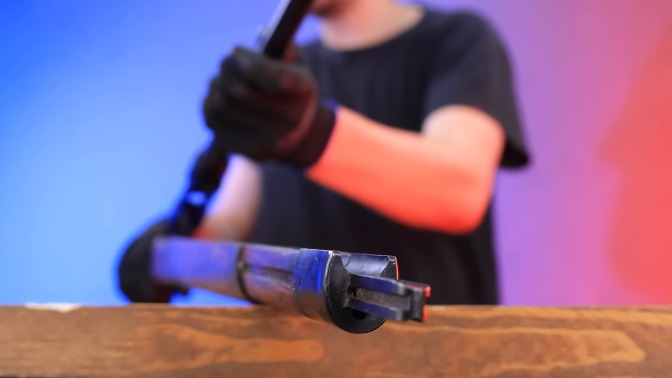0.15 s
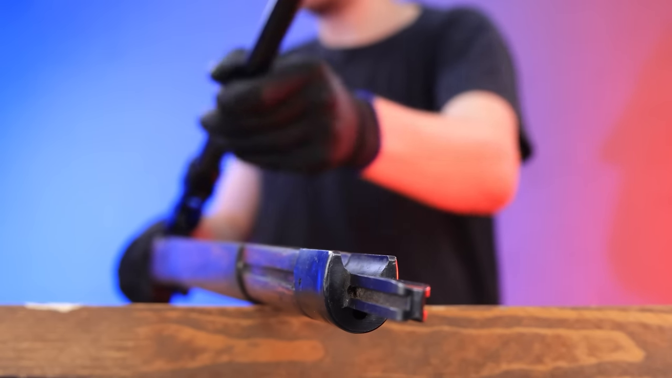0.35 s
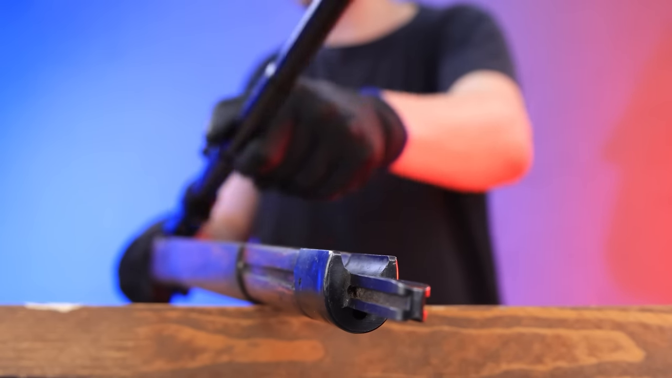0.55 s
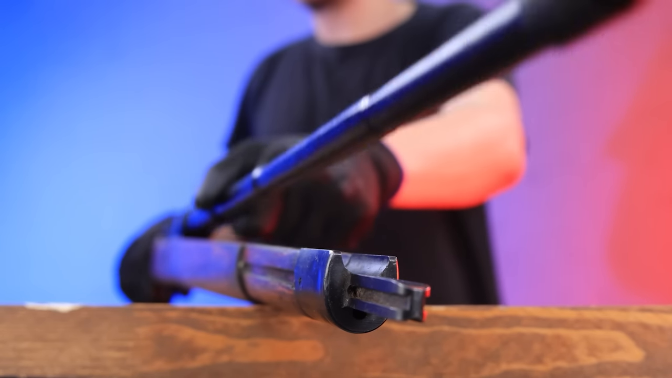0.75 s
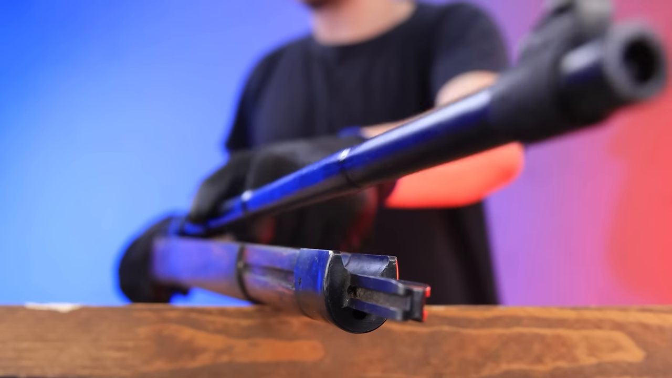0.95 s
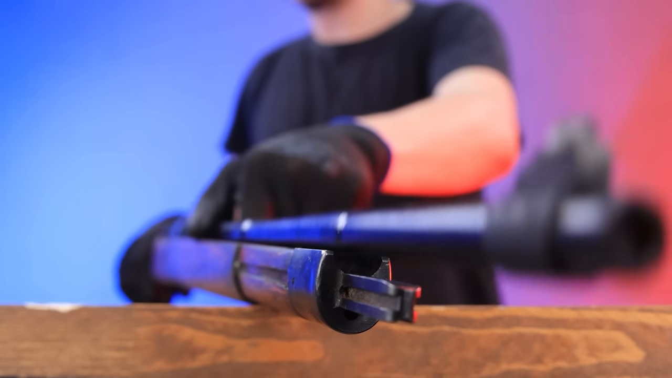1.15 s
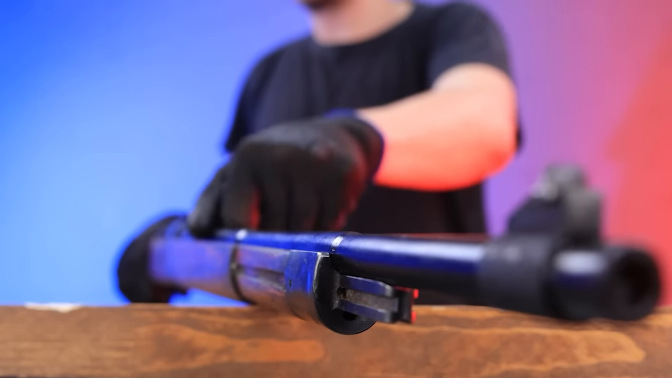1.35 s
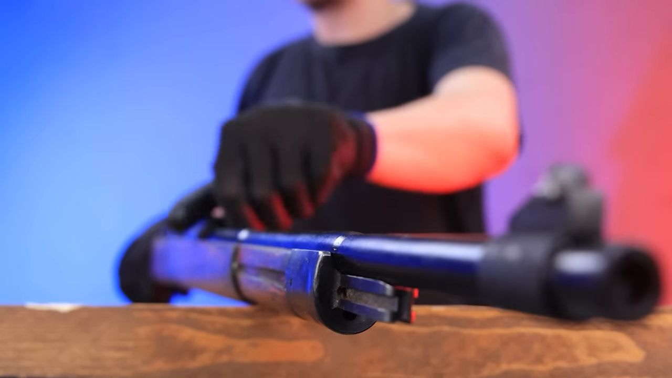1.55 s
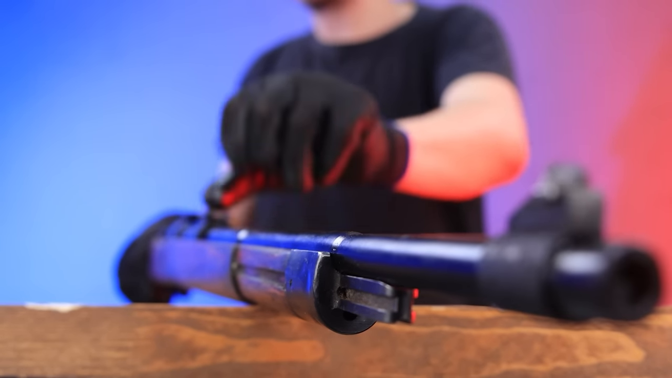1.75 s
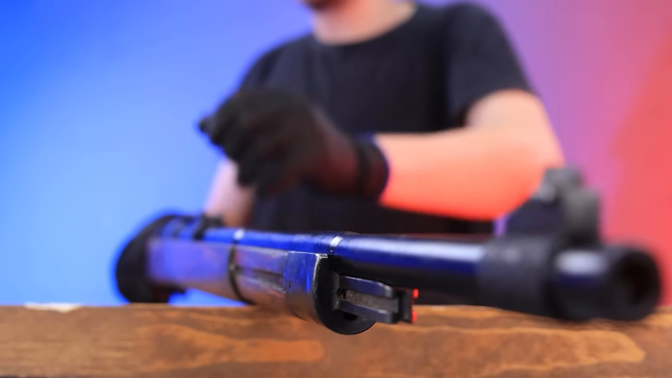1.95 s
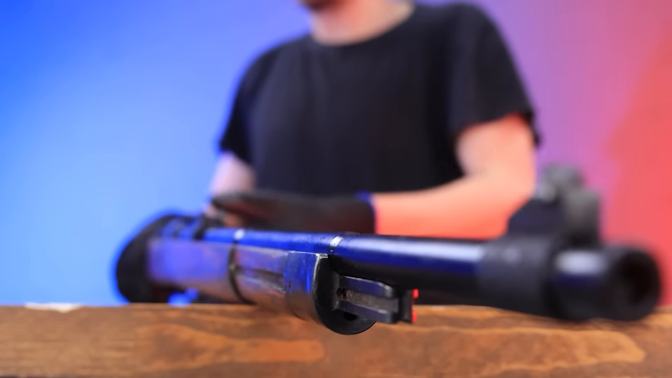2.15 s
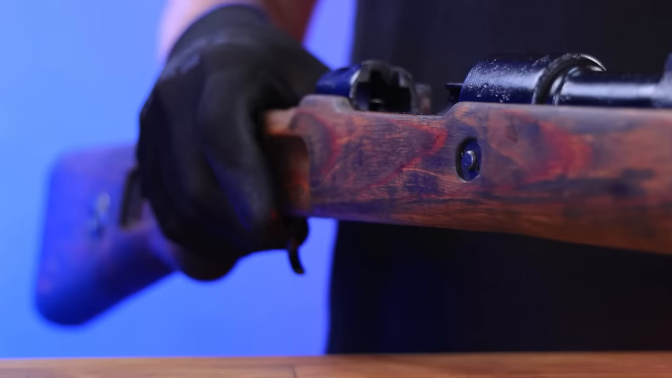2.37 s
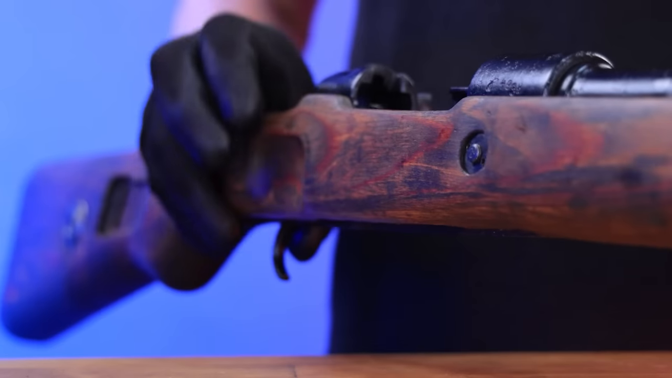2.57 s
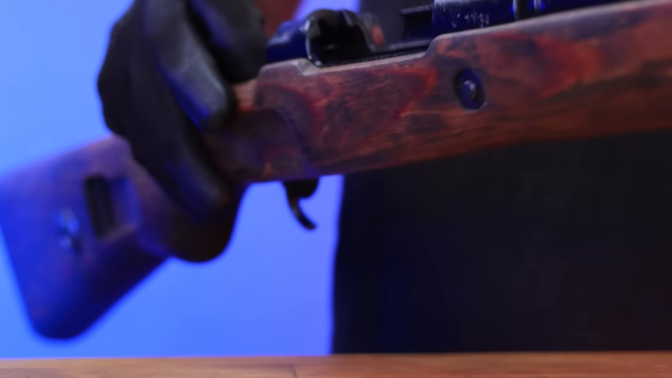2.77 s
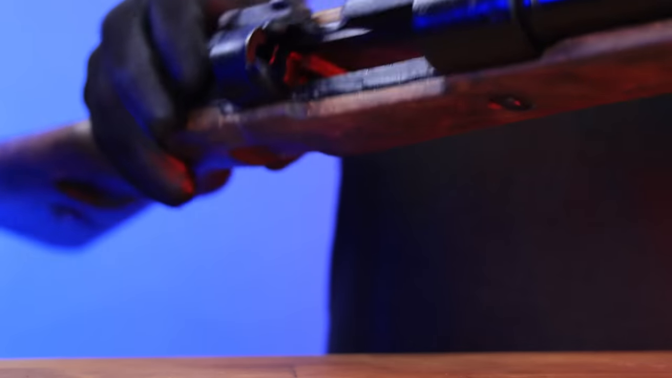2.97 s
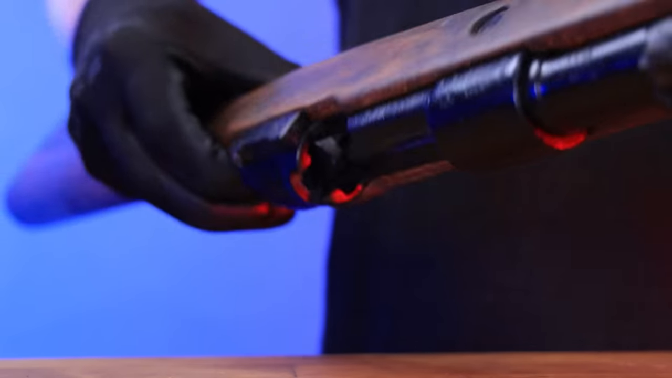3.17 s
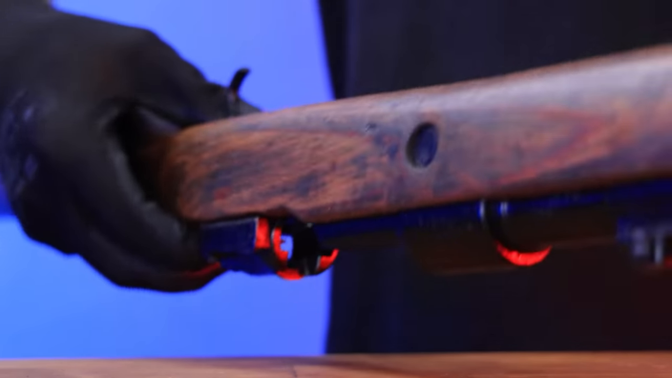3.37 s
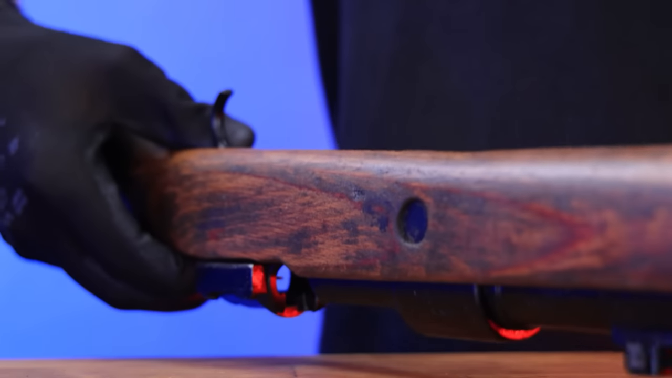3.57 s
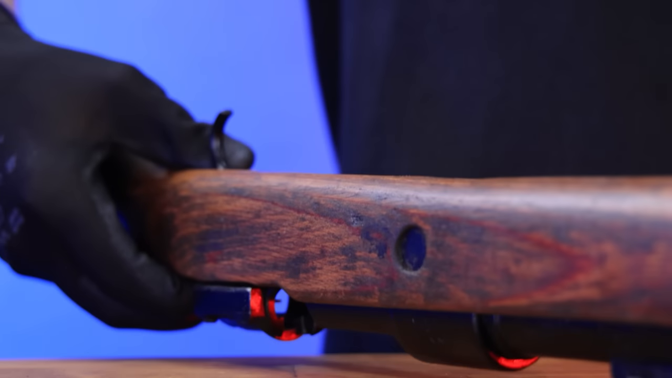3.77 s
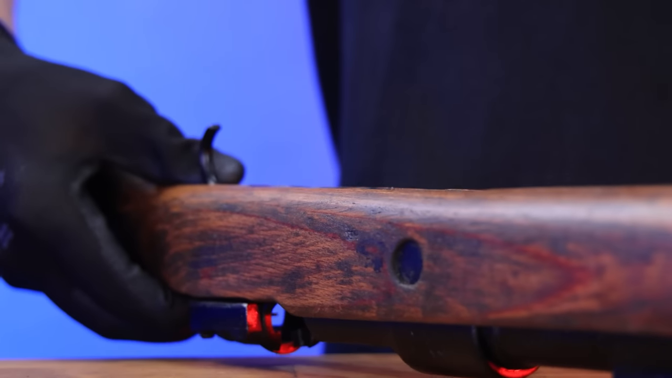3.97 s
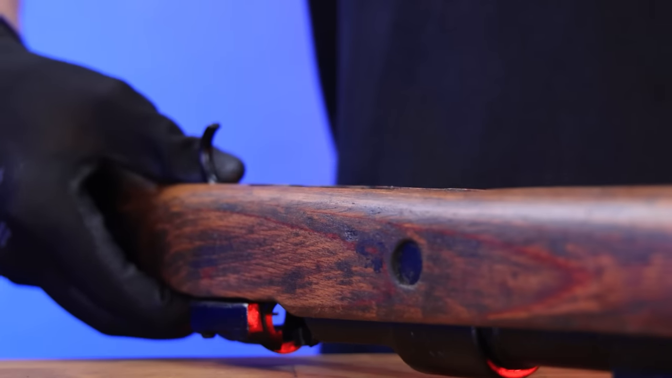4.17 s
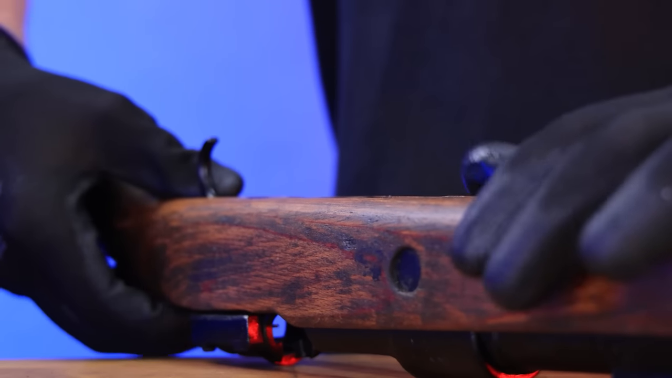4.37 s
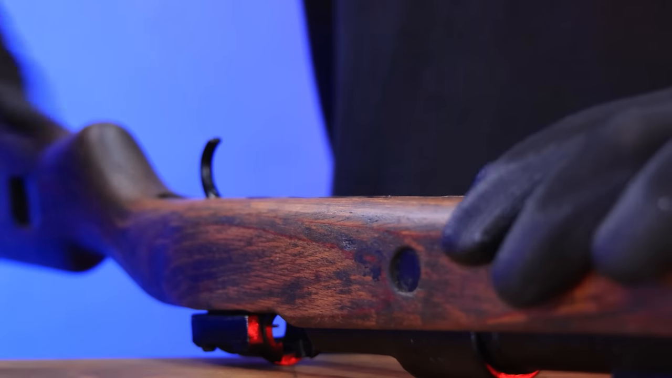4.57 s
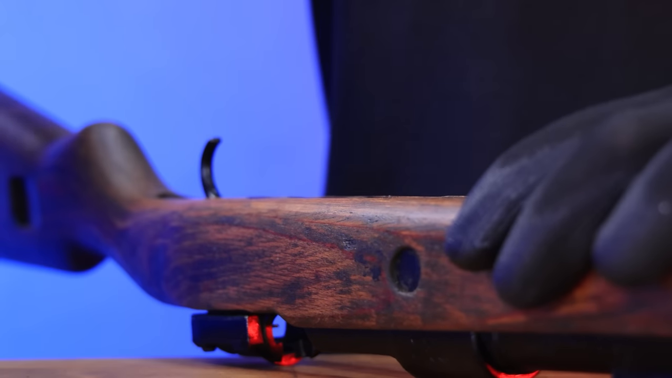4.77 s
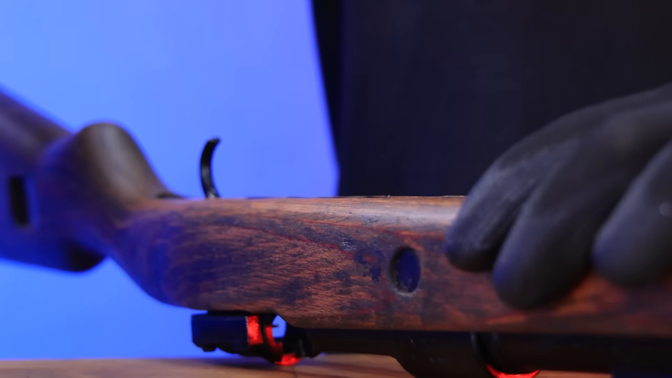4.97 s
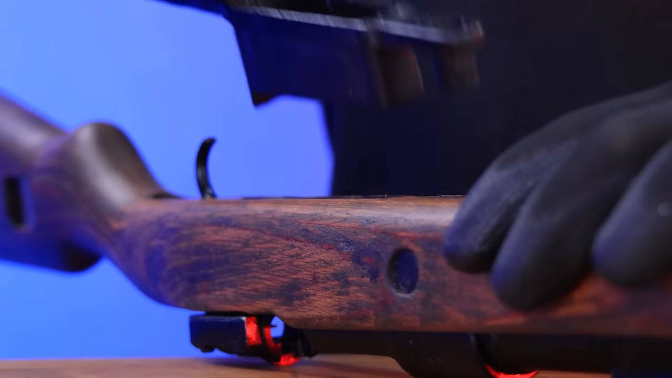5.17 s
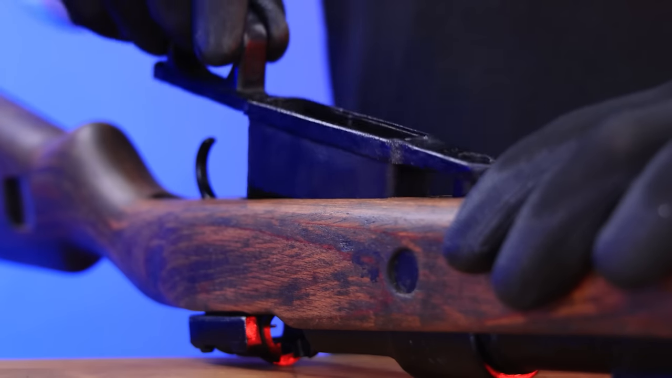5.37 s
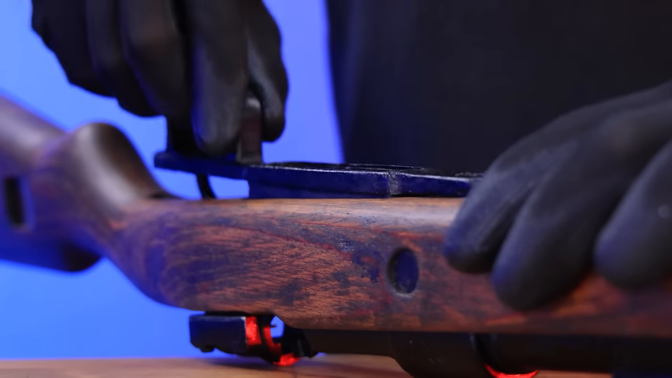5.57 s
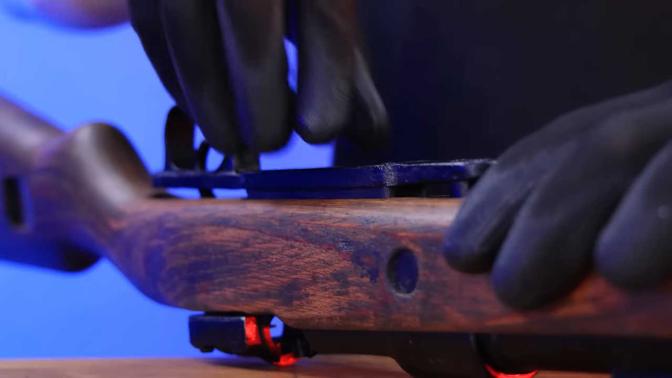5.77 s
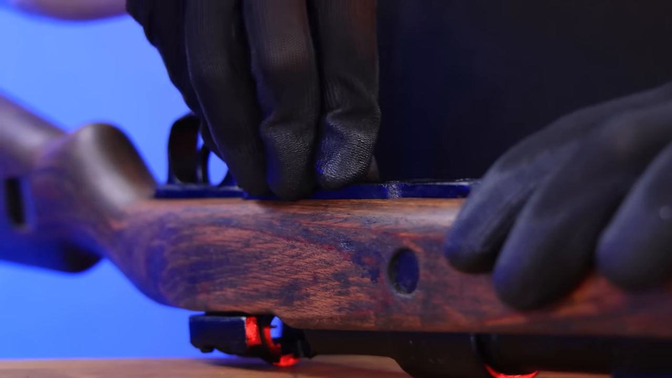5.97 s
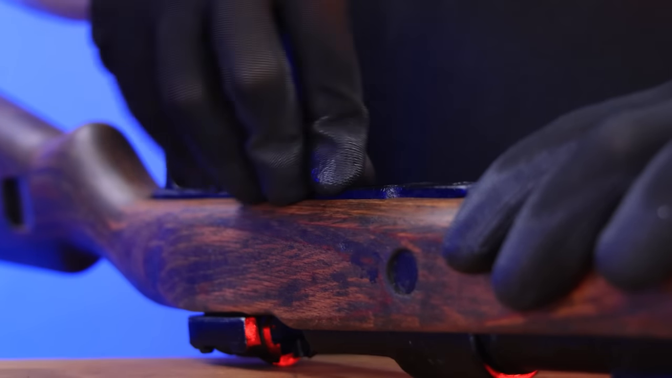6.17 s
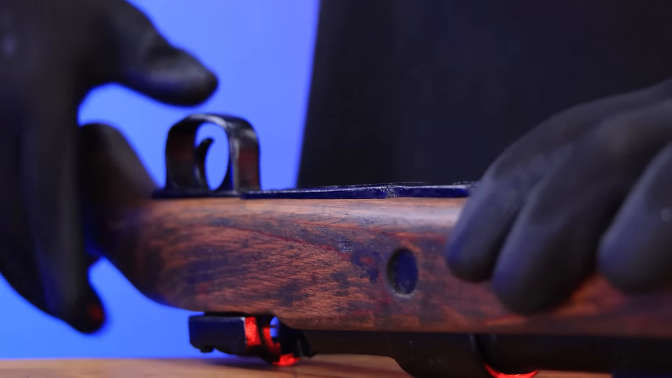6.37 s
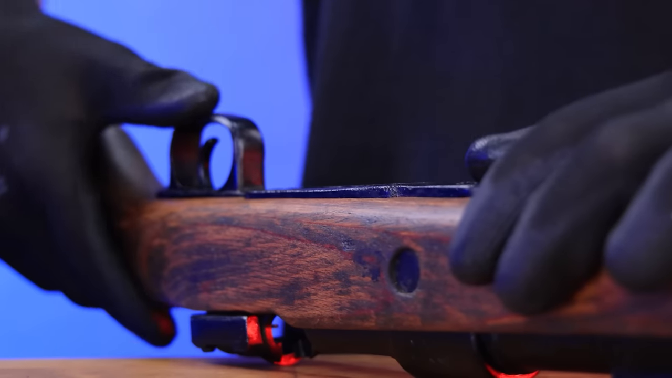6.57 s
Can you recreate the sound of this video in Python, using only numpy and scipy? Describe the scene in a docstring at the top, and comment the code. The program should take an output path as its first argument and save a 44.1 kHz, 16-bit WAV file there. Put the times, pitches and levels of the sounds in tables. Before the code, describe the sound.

In a small, quiet workshop with a faint low hum, gloved hands assemble a rifle close to the microphone. Faint wooden bumps and glove rubs lead to a loud steel-and-wood clunk with a thin high ring. Two needle-sharp ticks and a woody snap follow. Fabric rustles as the rifle turns, a metallic clack sounds, then a firm knock on the bench. Softer knocks and dull clicks end it as the magazine is seated.

```python
"""A bolt-action rifle is put together on a wooden bench in a small workshop, over still air and a faint hum.
First the barrel is lowered, drops into the stock, sings on and is pressed home; the tang snaps in with two dry ticks.
Then gloves rub as the stock turns in the grip, and the rifle is turned over and laid down with a knock.
Last the hands shift, and the magazine goes in and is seated.
Each touch is a crunch of tiny impacts fed to steel or wood resonances; the gloves are grainy filtered noise."""
import sys
import numpy as np
from scipy import signal
from scipy.fft import rfft, irfft, next_fast_len
from scipy.io import wavfile

SR = 44100
rng = np.random.default_rng(int(sys.argv[2]) if len(sys.argv) > 2 else 0)


def waveform_to_disk(signal):
    """Save audio, clipped to [-1, 1], as 16-bit WAV at the path in sys.argv[1]."""
    frames = np.transpose(np.atleast_2d(signal))
    scaled = np.clip(frames, -1, 1) * 32767
    samples = np.round(scaled).astype(np.int16)
    wavfile.write(sys.argv[1], SR, samples)


N = 292383
TIME = np.arange(N) / SR
SPAN = SR // 2   # samples given to a tail
TOUCH = SR // 4   # samples given to one touch
LEAD_S = .03   # room for the swell before a touch


def from_db(db):
    """Decibels to an amplitude factor."""
    return 10 ** (np.asarray(db) / 20)


def rms_one(x):
    """Scale to an rms of 1."""
    return x / np.sqrt(np.mean(x ** 2) + 1e-20)


def energy_one(pair):
    """Scale each channel to an energy of 1."""
    return pair / np.sqrt(np.sum(pair ** 2, axis=1, keepdims=True) + 1e-20)


def at_hz(points, hz):
    """Read a table on a log-frequency axis."""
    table = np.array(points)
    return np.interp(np.log(hz), np.log(table[:, 0]), table[:, 1])


def band(x, edges_hz, kind="band", order=2):
    """Causal Butterworth filter."""
    edges_hz = np.clip(edges_hz, 10, .45 * SR)
    sos = signal.butter(order, edges_hz, kind, fs=SR, output="sos")
    return signal.sosfilt(sos, x + 1e-18)


def add(out, s, sound):
    """Lay a sound into the track at time s, trimmed to the track's ends."""
    i = round(s * SR)
    out[..., max(i, 0):i + sound.shape[-1]] += sound[..., max(-i, 0):N - i]


def stereo(pair, side_db):
    """Left and right from a mid and a side signal, at equal power."""
    mid, side = pair[0], from_db(side_db) * pair[1]
    polarity = np.array([[1], [-1]])
    return (mid + side * polarity) / np.sqrt(1 + from_db(side_db) ** 2)


def coloured(spectrum):
    """Two unrelated noises of one colour, together at an rms of 1."""
    size = next_fast_len(N)
    hz = np.maximum(np.fft.rfftfreq(size, 1 / SR), 1)
    white = rfft(rng.standard_normal((2, size)))
    return rms_one(irfft(white * from_db(at_hz(spectrum, hz)), size)[:, :N])


def noise_bands(size):
    """Half-octave noise bands with their centres; each is a pair, and neighbours use unrelated noises."""
    edges = np.geomspace(20, 18000, 21)
    white = rng.standard_normal((2, 2, size))
    bands = []
    for k, (lo, hi) in enumerate(zip(edges, edges[1:])):
        bands.append((np.sqrt(lo * hi), band(white[k % 2], [lo, hi])))
    return bands


def crunch(length, onset, release, per_s, spread_db):
    """Force of one touch: tiny impacts of uneven size that swell and fade as the faces settle."""
    t = np.arange(TOUCH) / SR - LEAD_S
    rise = 1 + np.tanh(t / (2 * onset))
    fall = 1 + np.tanh((length - t) / (2 * release))
    hits = rng.random(TOUCH) < per_s / SR
    sizes = from_db(spread_db * np.clip(rng.standard_normal(TOUCH), -2, 2))
    signs = rng.choice([-1, 1], (2, TOUCH))   # unrelated in mid and side
    return rise * fall * hits * sizes * signs


def resonate(force, modes, damping_hz, bare_db):
    """Each resonance takes its share of the blow and rings it out; some of the contact is heard bare."""
    ring = 0
    for k, (hz, width, db) in enumerate(modes):
        r = np.exp(-np.pi * (width + damping_hz) / SR)   # more damping, shorter ring
        poles = [1, -2 * r * np.cos(2 * np.pi * hz / SR), r * r]
        mode = signal.lfilter([1, 0, -1], poles, force + 1e-18)
        ring = ring + (-1) ** k * from_db(db) * np.sqrt(width) * energy_one(mode)
    return energy_one(ring) + from_db(bare_db) * energy_one(force)


def tilted(level_db, brightness_db, lift_db):
    """Low, middle and high levels of a blow: the harder the contact, the more goes to the high modes."""
    outer_db = level_db - lift_db
    return [outer_db - brightness_db, level_db, outer_db + brightness_db]


def voiced(pair, length, edges_hz, levels_db):
    """Where and how hard a part is met shares the blow's energy among its low, middle and high modes."""
    total = 0
    for lo, hi, db in zip(edges_hz, edges_hz[1:], levels_db):
        total = total + from_db(db) * energy_one(band(pair, [lo, hi], order=3))
    return np.sqrt(length * SR) * total   # a longer touch carries more energy


# still air of the room: (f/Hz, relative level/dB per Hz)
AIR_SPECTRUM = [(20, -19.5), (48, -1.5), (75, -19.5), (105, -14.5), (150, -17), (210, -15.5), (270, -16),
                (320, -7.5), (400, -19), (700, -18.5), (1100, -20.5), (2500, -31), (6000, -42.5),
                (16000, -43.5)]
# how diffuse the air is: (f/Hz, tilt of its side level/dB)
AIR_WIDTH = [(60, -9.5), (180, -5), (550, -6), (1650, -3.5), (4970, 0), (15000, -2)]
# mains hum partials: (f/Hz, level/dB rms before waver and dips)
HUM_PARTIALS = [(49, -60), (150.3, -67), (313, -68), (651, -77.5)]


def background(air_db=-60.5, side_db=-5, waver=.15, waver_hz=12):
    """Still air, diffuse above the bass, and a wavering mains hum."""
    hum = 0
    for hz, db in HUM_PARTIALS:
        wavering = 1 + waver * rms_one(band(rng.standard_normal(N), waver_hz, "low"))
        tone = np.sin(2 * np.pi * (hz * TIME + rng.random()))
        hum = hum + from_db(db) * np.sqrt(2) * wavering * tone
    side_spectrum = [(hz, db + at_hz(AIR_WIDTH, hz)) for hz, db in AIR_SPECTRUM]
    air = stereo([coloured(AIR_SPECTRUM)[0], coloured(side_spectrum)[0]], side_db)
    return hum + from_db(air_db) * air


# brief dips of gloves and background: (t/s, depth/dB, recovery time constant/s)
LEVEL_DIPS = [(0.949, 12, 0.29), (2.35, 11, 0.062)]


def dips(steady_db=0.78):
    """Gain of the quiet sounds: twice it drops at once and creeps back."""
    lost_db = 0
    for s, depth_db, recovery in LEVEL_DIPS:
        lost_db = lost_db + depth_db * (TIME >= s) * np.exp(-np.abs(TIME - s) / recovery)
    return from_db(steady_db - lost_db)


# how long the workshop rings: (f/Hz, t60/s)
ROOM_DECAY = [(60, 0.47), (250, 0.21), (1000, 0.25), (4000, 0.21), (8000, 0.1), (15000, 0.34)]


def workshop(x, first_echo_s=0.0045, side_db=-2):
    """A short diffuse tail: each band of noise dies at its own pace, longest in the bass."""
    t = TIME[:SPAN]
    tail = sum(noise * from_db(-60 * t / at_hz(ROOM_DECAY, hz)) for hz, noise in noise_bands(SPAN))
    fade_in = np.clip(t / first_echo_s - 1, 0, 1)   # silent until the first echo
    tail = stereo(tail, side_db) * fade_in
    return signal.fftconvolve(x, energy_one(tail), axes=1)[:, :N]


def stroke(s, rise, hold, rise_db=25, fade_db_per_s=284):
    """Level in dB of one stroke: the hand gathers speed, slides and comes to rest."""
    gathering = rise_db * np.maximum(s - TIME, 0) / rise
    resting = fade_db_per_s * np.maximum(TIME - s - hold, 0)
    return -gathering - resting


# colour of fabric on steel and wood: (f/Hz, relative level/dB per Hz)
RUB_SPECTRUM = [(530, -32), (900, 0), (1190, -1.5), (1280, -4.5), (1410, 0), (2090, 1.5), (4740, 2),
                (5280, 1), (14200, -5.5), (16000, -19.5)]
# glove strokes: (t at full speed/s, rise/s, hold/s, rub level/dB before trims, hiss over rub/dB)
# the hand slides down the barrel and lets go; from 2.5 s the stock turns in the grip;
# from 4.5 s the hands shift to fetch the magazine and press it in
GLOVE_STROKES = [ (0, .05, 0.14, -70, -23), (0.358, 0.11, 0.025, -52.5, -0.5),
                 (0.41, .1, 0.041, -56.5, -5.5), (0.652, 0.085, 0.011, -67.5, -11),
                 (0.887, 0.067, 0.025, -74, -9), (2.105, 0.26, 0.0071, -63.5, -1.5),
                 (2.192, 0.044, 0.093, -48, 1.5), (2.547, .17, 0.0039, -56.5, 2.5),
                 (2.615, 0.036, 0.0093, -53, -1.5), (2.797, 0.18, 0.016, -55, 1),
                 (2.87, 0.091, .022, -47, 1.5), (2.955, 0.071, 0.079, -54, -2),
                 (3.104, 0.074, 0.037, -52.5, -2.5), (3.188, 0.062, .03, -55, -2.5),
                 (3.547, 0.15, .015, -51, -8), (3.628, 0.13, .03, -63.5, -0.5),
                 (3.967, 0.23, 0.031, -53, -11), (4.089, 0.2, 0.044, -54, -9.5),
                 (4.216, 0.13, 0.13, -55, -3), (4.516, 0.079, 0.034, -64, -4.5),
                 (4.68, .2, 0.0088, -67, 1.5), (4.908, 0.029, 0.011, -63, -3.5),
                 (5.079, .2, .01, -74, -2.5), (5.47, .1, .02, -68, -12), (5.681, .1, 0.023, -66.5, 0.5),
                 (6.15, .3, .01, -71.5, -4.5), (6.251, 0.095, .025, -59.5, -0.5),
                 (6.435, 0.017, 0.0092, -61.5, 2.5), (6.512, 0.16, 0.1, -59, -10.5)]


def gloves(grain_db=1.5, grain_hz=350, split_hz=6000, side_db=-3.5, rub_trim_db=-1, hiss_trim_db=-0.44):
    """Fabric drags over the rifle; its threads catch and let go, which makes rub and hiss grainy."""
    rub_power, hiss_power = 0, 0
    for s, rise, hold, level_db, hiss_db in GLOVE_STROKES:
        power = from_db(np.maximum(level_db + stroke(s, rise, hold), -140)) ** 2
        rub_power = rub_power + power
        hiss_power = hiss_power + power * from_db(hiss_db) ** 2
    grain = from_db(grain_db * rms_one(band(rng.standard_normal(N), grain_hz, "low")))
    friction = stereo(coloured(RUB_SPECTRUM), side_db) * grain
    rub = rms_one(band(friction, split_hz, "low", order=3))
    hiss = rms_one(band(friction, split_hz, "high", order=3))
    rub = from_db(rub_trim_db) * np.sqrt(rub_power) * rub
    hiss = from_db(hiss_trim_db) * np.sqrt(hiss_power) * hiss
    return rub + hiss


# stock and bench resonating together: (f/Hz, width/Hz before grip damping, relative level/dB)
WOOD_MODES = [(26, 6.3, 9), (41.6, 12, 9.5), (77, 54, -4), (126, 49, -2.5), (172, 17, -1.5), (346, 18, 1.5),
              (410, 55, -13.5), (510, 29, 2), (564, 75, -2), (719, 72, -9.5), (743, 28, -10),
              (944, 24, -4.5)]
# edges of the low, middle and high wood modes: (f/Hz)
WOOD_EDGES = [25, 110, 400, 900]
# colour and stereo width of the knocks in each position: (lift of middle modes/dB, side level/dB)
POSITION_COLOUR = {"rocking": (3.3, -2.7), "upright": (6.3, -29.5), "landing": (8.7, -5.5),
                   "inverted": (12.5, -0.18)}
# knocks: (t/s, length/s, bending f/Hz, position, middle level/dB before the wood trim, brightness/dB)
WOOD_KNOCKS = [ (.015, 0.04, 163, "rocking", -43, -4.5), (0.09, 0.053, 246, "rocking", -39.5, -6),
               (0.178, 0.014, 237, "rocking", -49.5, -10.5), (0.41, .054, 116, "rocking", -57, -10.5),
               (1.032, 0.028, 339, "upright", -59.5, -1.5), (1.122, 0.02, 142, "upright", -54, 2),
               (1.167, 0.012, 150, "upright", -54, 3.5), (1.185, 0.028, 222, "upright", -41.5, 11),
               (1.236, 0.017, 346, "upright", -16, -1), (1.246, 0.01, 134.2, "upright", -20.5, 1),
               (1.264, 0.017, 294, "upright", -22.5, 7), (1.753, 0.019, 175, "upright", -27.5, 3),
               (1.77, 0.011, 108, "upright", -31.5, -2), (1.785, 0.054, 176, "upright", -41.5, -1),
               (3.183, 0.054, 155, "rocking", -53, 4), (3.239, 0.013, 295, "rocking", -43, 10.5),
               (3.899, 0.083, 183, "rocking", -55, -12.5), (4.074, 0.042, 203, "rocking", -46, -6),
               (4.315, 0.012, 342, "landing", -19, 1.5), (4.327, 0.022, 334, "landing", -22.5, -2.5),
               (4.379, 0.065, 272, "rocking", -41, -5.5), (4.457, 0.0091, 139, "rocking", -40.5, -11),
               (4.577, 0.024, 327, "rocking", -52, -3), (4.892, 0.04, 181.4, "inverted", -41, 8.5),
               (5.354, 0.031, 184, "inverted", -32, 10), (5.387, 0.082, 191, "inverted", -38.5, 2.5),
               (5.557, 0.043, 229, "inverted", -39, 5.5), (5.926, 0.046, 236, "inverted", -33.5, 3),
               (5.997, .051, 214, "inverted", -45.5, -1), (6.054, 0.048, 199, "inverted", -51, -11.5),
               (6.192, 0.018, 190, "inverted", -46, 7), (6.313, 0.036, 190, "inverted", -51.5, 4.5)]


def wood(per_s=2500, spread_db=3, onset_s=0.0038, release_s=0.0036, push_share=0.94,
         grip_hz=3, bare_db=3, bend_width_hz=30, bend_db=2):
    """The rifle's weight knocks through stock and bench; its bending pitch depends on hold and props."""
    out = np.zeros((2, N))
    for s, length, bend_hz, position, level_db, brightness_db in WOOD_KNOCKS:
        lift_db, side_db = POSITION_COLOUR[position]
        levels_db = tilted(level_db, brightness_db, lift_db)
        force = crunch(push_share * length, onset_s, release_s, per_s, spread_db)
        modes = [*WOOD_MODES, (bend_hz, bend_width_hz, bend_db)]
        ringing = resonate(force, modes, grip_hz, bare_db)
        sound = voiced(ringing, length, WOOD_EDGES, levels_db)
        add(out, s - LEAD_S, stereo(sound, side_db))
    return out


# clean modes of the barrel's free end after its drop: (f/Hz, starting level/dB, t60/s)
RING_MODES = [ (2885, -51, 1.25), (2649, -51, .3), (4050, -59, .28), (4120, -40, 0.11), (6406, -49, 0.27)]


def barrel_ring(drop_s=1.245):
    """The free end of the barrel keeps a few clean modes going: decaying sines from the drop on."""
    age = np.maximum(TIME - drop_s, 0)   # zero age keeps each sine silent
    ring = 0
    for hz, db, t60 in RING_MODES:
        ring = ring + from_db(db - 60 * age / t60) * np.sin(2 * np.pi * hz * age)
    return ring


# the tang snaps into its seat: (t/s, peak level/dB)
TANG_SNAPS = [(1.7278, -18), (1.731, -12.5)]


def snaps(t60=0.00086, low_hz=2500, high_hz=12000):
    """Two dry, needle-sharp ticks: band-limited noise that dies within a millisecond or so."""
    out, t = np.zeros(N), TIME[:SPAN]
    for s, db in TANG_SNAPS:
        burst = rng.standard_normal(SPAN) * from_db(-60 * t / t60)
        tick = band(burst, [low_hz, high_hz], order=1)
        add(out, s, from_db(db) * tick / np.abs(tick).max())
    return out


# resonances of each steel part: (f/Hz, width/Hz before grip damping, relative level/dB)
STEEL_MODES = { "barrel": [(798, 47, -1.5), (1570, 7, -10), (1699, 60, -10), (2020, 170, -7.5),
               (2607, 100, -10), (2993, 12, 1.5), (3800, 290, -13.5), (4170, 24, -13), (4200, 31, -8.5),
               (4970, 46, -3.5), (5600, 26, -19), (5100, 29, -14.5), (6100, 170, -14), (7040, 63, -8.5),
               (8750, 97, -18), (7760, 110, -13.5), (8500, 27, -19.5), (9000, 29, -26), (11600, 39, -15),
               (10600, 150, -37.5), (10900, 29, -25), (12500, 44, -18)], "tang": [(1290, 12, -16),
               (1775, 14, -8.5), (3090, 46, -14), (3515, 81, -10), (4130, 120, -20), (4560, 29, -9),
               (5580, 230, -10), (6420, 91, -8), (6730, 16, -4.5), (7060, 110, -14), (7930, 48, -21.5),
               (8650, 56, -18)], "receiver": [(1230, 55, -16), (1960, 32, -6), (2050, 85, -10.5),
               (2466, 120, -11.5), (2740, 14, -9), (3590, 100, -6), (4190, 31, -6.5), (4520, 32, -3.5),
               (4800, 120, -15), (5560, 150, -12), (6190, 19, -64), (6620, 18, -78), (6910, 150, -12.5),
               (8800, 37, -21), (9200, 33, -43), (9850, 55, -35)], "action": [(800, 110, -7),
               (1450, 5, 9.5), (1860, 9, -1), (2330, 9.7, 5.5), (2620, 180, -12.5), (3070, 29, 3),
               (3420, 230, -5), (4020, 62, -10), (4200, 19, -56.5), (4480, 110, 7.5), (5000, 40, -29),
               (6050, 11, -39.5), (5840, 140, -2.5), (6270, 26, 3.5), (7480, 58, -7), (7820, 66, -30.5),
               (8400, 32, -40), (8600, 53, -13), (9100, 33, -55.5), (9380, 27, -39.5)],
               "magazine": [(820, 40, -6), (1340, 31, 0.5), (2060, 55, -6), (2990, 52, 1), (3430, 41, 5.5),
               (3420, 20, -3.5), (4290, 120, 0.5), (5160, 35, -23), (8270, 44, -31), (8720, 64, -29)],
               "floorplate": [(835, 83, -9.5), (1097, 44, -3.5), (1192, 81, -11.5), (1700, 54, -9),
               (2210, 36, -38), (3340, 83, -49), (4610, 390, -8), (5900, 230, -5.5), (6550, 180, -12),
               (7500, 210, -10), (9330, 500, -44), (10920, 300, -44), (11940, 1100, -20)],
               "guard": [(2580, 120, -35), (3430, 40, 4), (4360, 51, -21.5), (5750, 40, 2.5),
               (11140, 110, -0.5)]}
# edges of the low, middle and high steel modes: (f/Hz)
STEEL_EDGES = [800, 2500, 8000, 16000]
# colour and stereo width of each part's contacts: (lift of middle modes/dB, side level/dB)
CONTACT_COLOUR = {"barrel": (4.3, -7.5), "tang": (4.3, -18), "receiver": (10.2, 0.33), "action": (9.4, 0),
                  "magazine": (11, 1.8), "floorplate": (0.5, -.5), "guard": (8.6, 0.37)}
# contacts: (t/s, length/s, onset/s, part, middle level/dB before the steel trim, brightness/dB)
# the barrel drops into the stock and is pressed home; from 3.1 s the rifle is turned over
# and laid down; from 5.3 s the magazine goes in and is seated
STEEL_CONTACTS = [ (0.015, 0.021, 0.009, "barrel", -67.5, -15), (0.078, 0.039, 0.018, "barrel", -79, -23.5),
                  (1.129, 0.025, .001, "barrel", -70.5, -8), (1.199, 0.11, .011, "barrel", -56, -12),
                  (1.2392, 0.02, .0018, "barrel", -21, -6), (1.25, .026, .0028, "barrel", -33.5, -7.5),
                  (1.606, 0.046, 0.0055, "receiver", -55.5, 3.5), (1.694, 0.043, .005, "receiver", -57, 4),
                  (1.733, 0.0057, 0.00091, "tang", -44, 4), (1.786, 0.027, .002, "barrel", -48, -6.5),
                  (1.754, 0.016, 0.00079, "tang", -39, -2.5), (1.7655, 0.013, .0009, "tang", -32, -1),
                  (3.145, 0.022, 0.0021, "receiver", -49.5, -14.5),
                  (3.182, 0.033, .0005, "receiver", -53, -17.5), (3.242, .025, 0.0048, "receiver", -27, -6),
                  (3.6, 0.025, .0019, "tang", -50.5, 2.5), (4.192, 0.03, 0.012, "receiver", -53.5, -14),
                  (4.332, 0.027, 0.0044, "action", -23.5, -9), (4.36, .013, .0065, "action", -57, 3.5),
                  (4.428, 0.022, 0.0065, "action", -59, 5), (5.357, 0.021, .0028, "magazine", -60, -16),
                  (5.39, 0.03, 0.002, "magazine", -47.5, -13),
                  (5.536, 0.027, 0.0017, "floorplate", -68, -13.5),
                  (5.566, 0.03, 0.0032, "floorplate", -45.5, -8),
                  (5.887, 0.021, 0.0043, "floorplate", -51, -3),
                  (5.935, 0.045, .015, "floorplate", -58.5, -6.5),
                  (6.205, .022, 0.0015, "guard", -53, -1.5),
                  (6.234, 0.026, 0.0032, "floorplate", -60.5, -4.5)]


def steel(per_s=4500, spread_db=2.0, release_s=.0025, grip_hz=55, slide_hz_per_s=18000,
          crack_db=-3, contact_hz=10000):
    """Steel meets steel: a crunch rings the part; the grip damps it, and a slow, sliding touch more so."""
    out = np.zeros((2, N))
    for s, length, onset, part, level_db, brightness_db in STEEL_CONTACTS:
        lift_db, side_db = CONTACT_COLOUR[part]
        levels_db = tilted(level_db, brightness_db, lift_db)
        force = crunch(length, onset, release_s, per_s, spread_db)
        damping_hz = grip_hz + slide_hz_per_s * onset
        ringing = resonate(force, STEEL_MODES[part], damping_hz, crack_db)
        softened = band(ringing, contact_hz, "low")
        sound = voiced(softened, length, STEEL_EDGES, levels_db)
        add(out, s - LEAD_S, stereo(sound, side_db))
    return out


def scene(steel_db=2.0, wood_db=1.14, steel_room_db=-10, wood_room_db=-12):
    """Steel and wood sound in the workshop, with the gloves and the background around them."""
    quiet = dips() * (background() + gloves())
    knocks = from_db(wood_db) * wood()
    metal = from_db(steel_db) * steel() + snaps()
    room = workshop(from_db(steel_room_db) * metal + from_db(wood_room_db) * knocks)
    return quiet + room + knocks + barrel_ring() + metal


def record(dry, cutoff_hz=15700):
    """The top is cut steeply by an elliptic low-pass."""
    sos = signal.ellip(10, .2, 80, cutoff_hz, fs=SR, output="sos")   # ripple and stopband in dB
    return signal.sosfilt(sos, dry)


dry = scene()
out = record(dry)
waveform_to_disk(out)
```